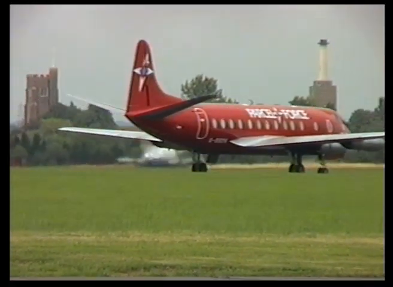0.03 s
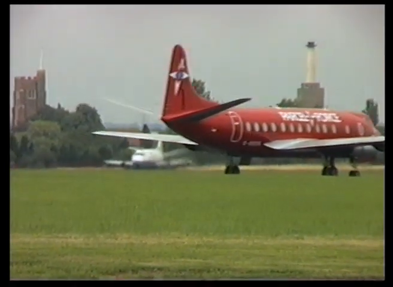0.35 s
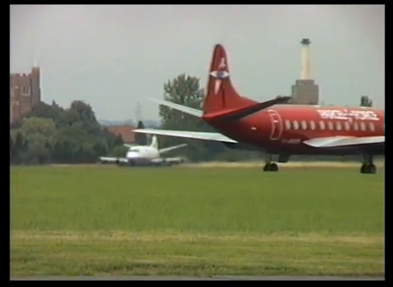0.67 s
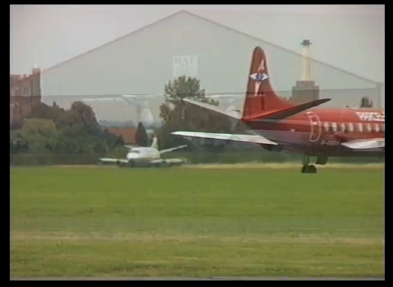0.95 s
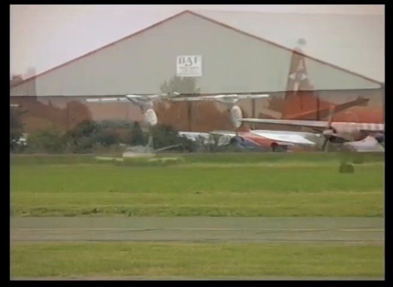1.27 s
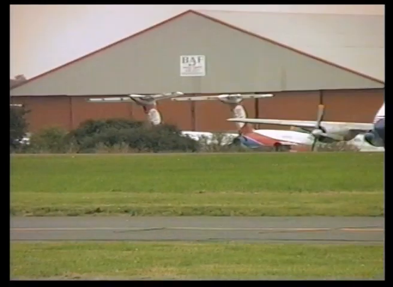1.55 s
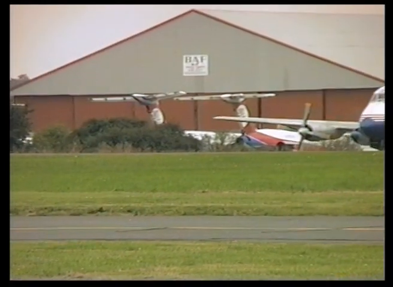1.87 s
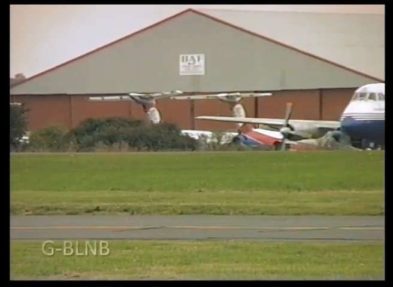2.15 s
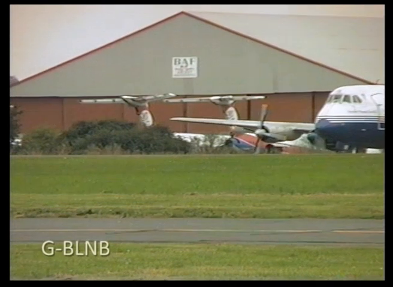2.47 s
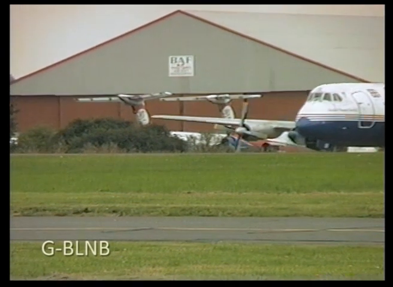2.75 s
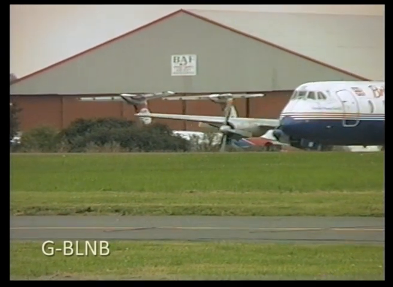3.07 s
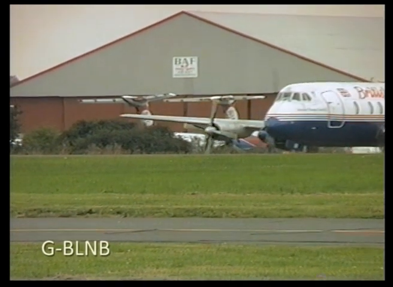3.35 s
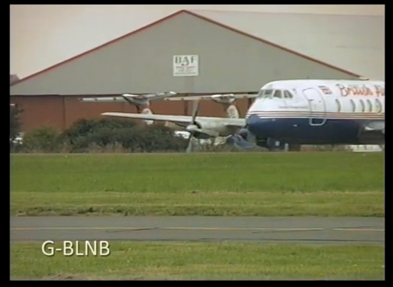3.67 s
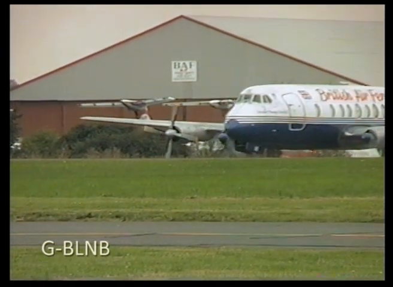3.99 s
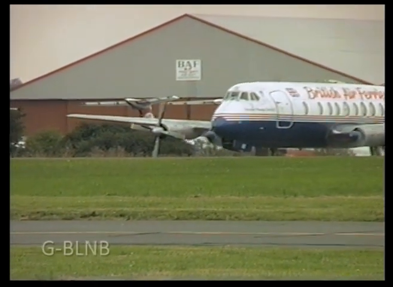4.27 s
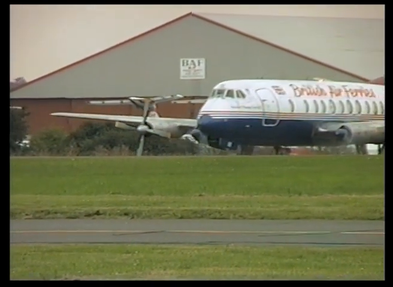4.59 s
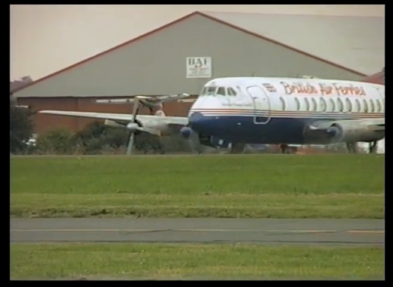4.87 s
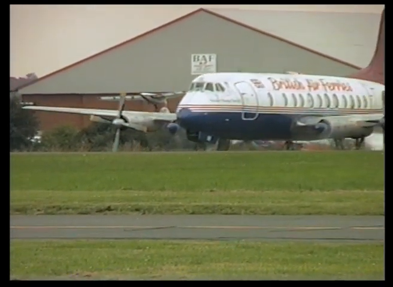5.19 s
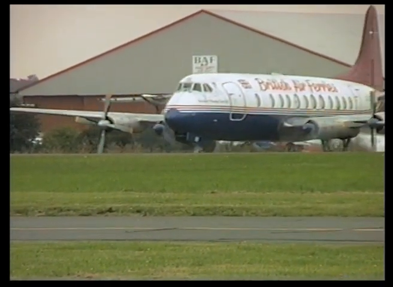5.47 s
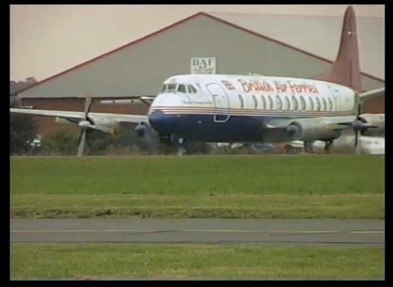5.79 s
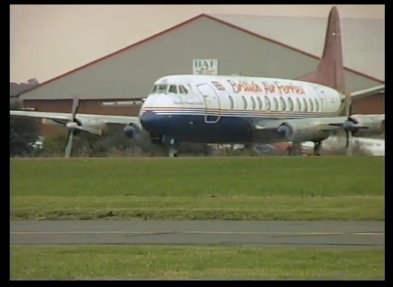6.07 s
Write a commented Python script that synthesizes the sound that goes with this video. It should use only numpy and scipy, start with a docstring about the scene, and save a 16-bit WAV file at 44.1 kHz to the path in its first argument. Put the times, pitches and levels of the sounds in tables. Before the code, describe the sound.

A taxiing propeller airliner drones briefly, then a second approaches with a piercing, wavering turbine whine and hiss as it throttles back.

```python
"""Exhaust roar and propeller drone, heard from behind a four-engined turboprop airliner taxiing away over a
grass airfield. The sound then cross-fades to a second one that comes nose first toward the microphone and
throttles back: its intakes rush, and its compressor whines sink in pitch and beat against each other, chopped
by the propeller blades. The loud whine slightly overloads the microphone's amplifier."""
import sys
import numpy as np
from scipy import signal
from scipy.fft import rfft, irfft, next_fast_len
from scipy.io import wavfile
from scipy.ndimage import map_coordinates

SR = 44100
rng = np.random.default_rng(int(sys.argv[2]) if len(sys.argv) > 2 else 0)


def generate_wav(sig):
    """Save sig (samples, or channels by samples) to the path in sys.argv[1] as 16-bit PCM at SR."""
    pcm = np.round(np.clip(np.atleast_2d(sig).T, -1, 1) * 32767).astype(np.int16)
    wavfile.write(sys.argv[1], SR, pcm)


N = 275184
SECONDS = np.arange(N) / SR
WHINE_PER_BLADE, WHINE_PER_GEAR = 53, 12.23   # whine cycles per propeller blade pass, per shaft turn


def from_db(db):
    """Decibels to gain."""
    return 10 ** (np.asarray(db) / 20)


def rms_one(x):
    """Scale to rms 1."""
    return x / np.sqrt(np.mean(x ** 2) + 1e-20)


def in_time(rows):
    """Each column of a curve table at every sample."""
    times, *columns = np.transpose(rows)
    return [np.interp(SECONDS, times, column) for column in columns]


def drift(rate):
    """Slow random wandering with spread 1, mostly below `rate` Hz."""
    pole = np.exp(-80 * np.pi * rate / SR)
    noise = rng.standard_normal(N // 40 + 2002)
    slow = signal.lfilter([1], [1, -2 * pole, pole * pole], noise)[2000:]
    return np.interp(np.arange(N) / 40, np.arange(len(slow)), rms_one(slow))


def turbulence(spectrum, low_hz, high_hz):
    """The part of a noise spectrum between two soft edges; rms 1."""
    size = next_fast_len(N)
    hz = np.maximum(np.arange(size // 2 + 1) * SR / size, 1)
    points_hz, points_db = np.transpose(spectrum)
    gain = from_db(np.interp(np.log(hz), np.log(points_hz), points_db))
    gain /= np.sqrt((1 + (low_hz / hz) ** 10) * (1 + (hz / high_hz) ** 10))
    return rms_one(irfft(rfft(rng.standard_normal(size)) * gain, size)[:N])


def phase_of(hz):
    """Running phase of a moving frequency."""
    return 2 * np.pi * np.cumsum(hz * np.ones(N)) / SR + rng.uniform(0, 2 * np.pi)


def tone(phase, scatter, rate):
    """A sine of rms about 1; gusty air scatters part of it into a narrow band of noise."""
    wave = (1 + scatter * drift(rate)) * np.sin(phase) + scatter * drift(rate) * np.cos(phase)
    return wave * np.sqrt(2 / (1 + 2 * scatter ** 2))


def harmonic(phase, k, scatter, rate):
    """The k-th multiple of a tone, starting at a random phase."""
    return tone(round(k) * phase + rng.uniform(0, 2 * np.pi), scatter, rate)


# Each row: peak time in seconds, level in dB, rough pitch in Hz, half-width in seconds.
BUFFETS = [(0.742, -23, 140, 0.012), (1.372, -23, 337, 0.048), (1.683, -38, 200, 0.024),
           (4.21, -30.5, 448, 0.0073), (4.369, -38, 370, 0.006), (4.63, -42, 330, .006)]

def buffets():
    """Soft knocks and buffets of air at the microphone: short swells of low noise."""
    out = np.zeros(N)
    for peak_s, db, hz, width_s in BUFFETS:
        band = signal.butter(2, [hz * 0.7, hz * 1.63], "band", fs=SR, output="sos")
        body = rms_one(signal.sosfilt(band, rng.standard_normal(N)))
        swell = np.exp(-.5 * ((SECONDS - peak_s) / width_s) ** 2)
        out += from_db(db) * swell * body
    return out


# Each row: frequency in Hz, relative noise density in dB.
EXHAUST_SPECTRUM = [(25, -28), (60, -12), (130, -2), (350, -8), (650, -1.5), (1050, -9), (1600, -9),
                    (2150, -11), (2420, -6.5), (2750, -16.5), (3080, -8), (3600, -19.5), (7000, -28),
                    (14000, -37.5)]

def exhaust(turn_s, rise_db_per_s=4):
    """Exhaust roar from behind; the rumble grows as the exhausts turn toward the microphone."""
    rumble_db = -30.5 + rise_db_per_s * np.minimum(SECONDS, turn_s)
    rumble = from_db(rumble_db) * turbulence(EXHAUST_SPECTRUM, 15, 385)
    roar = from_db(-23.2) * turbulence(EXHAUST_SPECTRUM, 350, 16000)
    return rumble + roar


# Each row: time in seconds, relative levels of the drone and of the whines in dB.
DEPARTING_LEVELS = [(0, -33, -34.5), (.25, -28, -44), (.5, -43, -34), (.75, -36, -39), (.92, -24, -36),
                    (1.2, -26, -39.5), (1.45, -32, -46)]
# Each row: multiple of the blade rate, relative level in dB.
DRONE_HARMONICS = [(1, -17), (2, -2), (3, -11), (4, -16.5), (6, -26)]
# Each row: one engine's whine in Hz, relative level in dB.
IDLE_WHINES = [(2344, 2), (2388, -8), (2437, 5), (2479, 3)]

def departing(blade_hz=93.9, fade_start_s=1.314, fade_db_per_s=44.5):
    """Tail to the microphone: exhaust, propeller drone and four weak whines die away together."""
    roar = exhaust(turn_s=fade_start_s)
    drone_db, whine_db = in_time(DEPARTING_LEVELS)
    blade = phase_of(blade_hz + .3 * drift(3))
    drone = sum(from_db(db) * harmonic(blade, k, scatter=0.21, rate=11) for k, db in DRONE_HARMONICS)
    whines = sum(from_db(db) * tone(phase_of(hz + 3 * drift(3)), scatter=0.63, rate=16)
                 for hz, db in IDLE_WHINES)
    fade = from_db(-fade_db_per_s * np.maximum(SECONDS - fade_start_s, 0))
    return fade * (roar + from_db(drone_db) * drone + from_db(whine_db) * whines)


# Each row: time in seconds, relative level in dB.
GEAR_LEVEL = [(1.8, -63), (2.4, -43), (3.3, -43), (4.4, -36), (6.24, -37)]
# Each row: multiple of the shaft rate, relative level in dB.
GEAR_HARMONICS = [(1, -22), (2, -5.5), (4, -1.5), (6, 4), (7, 5.5), (8, 3.5)]

def gearbox(whine_hz):
    """Harmonics of a gear shaft that slows with the oncoming engine."""
    shaft = phase_of(whine_hz / WHINE_PER_GEAR)
    level_db, = in_time(GEAR_LEVEL)
    tones = sum(from_db(db) * harmonic(shaft, k, scatter=0.093 * k, rate=9.7)
                for k, db in GEAR_HARMONICS)
    return from_db(level_db) * tones


# Each row: time in seconds, level in dB.
BUZZ_LEVEL = [(1.3, -40), (2.2, -37), (3.2, -44), (5.5, -75), (5.8, -37.5), (6.24, -33.5)]
# Each row: multiple of the blade rate, relative level in dB.
BUZZ_SPECTRUM = [(2, -25), (3, -11.5), (5, -12), (7, -5), (8, -5), (11, -1.5), (13, 1), (16, 1.5)]

def propellers(whine_hz, top_harmonic=16):
    """From in front, blades chop the air into a ragged buzz, geared to the compressor."""
    blade = phase_of(whine_hz / WHINE_PER_BLADE)
    level_db, = in_time(BUZZ_LEVEL)
    comb = 0
    for k in range(2, top_harmonic + 1):
        gain = from_db(np.interp(k, *np.transpose(BUZZ_SPECTRUM)))
        comb += gain * harmonic(blade, k, scatter=0.11 * k, rate=22)
    return from_db(level_db) * rms_one(comb)


# Each row: time in seconds, relative level in dB.
RUSH_LEVEL = [(1.15, -23.5), (1.5, -20), (2.26, -21.5), (2.67, -19), (2.88, -19.5), (4.64, -18.5),
              (4.79, -20), (5.27, -19.5), (6.2, -21)]
HISS_LEVEL = [(2.35, -25), (2.8, -30), (3.35, -24), (4.0, -29), (4.5, -25), (5.1, -23.5), (6.24, -28)]
BEAMED_LEVEL = [(2.0, -42), (2.7, -37), (3.05, -33), (3.5, -26.5), (4.2, -28), (4.6, -30.5), (5.85, -33.5),
                (6.1, -49)]
# Each row: frequency in Hz, relative noise density in dB.
RUSH_SPECTRUM = [(30, -25.5), (150, -22), (380, -28), (700, -19.5), (1000, -9), (1200, -3.5), (1500, 2),
                 (1900, -1.5), (2300, 1), (2550, -4), (2900, -10), (3500, -9)]
IDLE_HISS_SPECTRUM = [(2800, -14), (3100, 1), (3350, 3.5), (3700, -1.5), (4200, -6.5), (4800, -18),
                      (5500, -31.5), (7000, -35)]
BEAMED_SPECTRUM = [(3900, -6.5), (4400, 2.5), (4850, 0), (5400, -12.5), (6000, -12), (6800, -22),
                   (8000, -36), (10500, -39), (14000, -35)]

def intakes(whine_hz, idle_hz=3140):
    """Air rushes into the intakes, the compressors hiss, and a brighter hiss is beamed forward."""
    rush_db, = in_time(RUSH_LEVEL)
    rush = from_db(rush_db + 1.09 + 0.22 * drift(15)) * turbulence(RUSH_SPECTRUM, 15, 3880)
    # the hiss sinks in colour with the compressors' speed
    hiss_db, = in_time(HISS_LEVEL)
    speed = whine_hz / idle_hz
    idle_hiss = turbulence(IDLE_HISS_SPECTRUM, 2600, 8300)
    hiss = map_coordinates(idle_hiss, [np.cumsum(speed)], order=3, mode="wrap")
    hiss *= from_db(hiss_db + 0.6 * drift(9)) / speed ** 3.7
    # the beam is strongest when the intakes point at the microphone
    beamed_db, = in_time(BEAMED_LEVEL)
    beamed = from_db(beamed_db - 2.1 + 0.69 * drift(13)) * turbulence(BEAMED_SPECTRUM, 4500, 16000)
    return rush + hiss + beamed


def throttle_back(midpoint_s=2.21, ease_s=.59, drop_hz=675, base_hz=3045, creep_hz_per_s=17.3):
    """Pitch of the near compressor in Hz: an S-curve down to idle, on top of a slow creep upward."""
    power = 1 / (1 + np.exp((SECONDS - midpoint_s) / ease_s))
    return base_hz + creep_hz_per_s * SECONDS + drop_hz * power


# Air flowing through the propellers into the compressors.
# Each row: time in seconds, scatter of the whine, lead of the odd sidebands in radians.
INFLOW = [(1.4, 0.56, 0.89), (2.1, 0.15, 0.84), (5, 0.28, 1.1), (5.6, 0.18, 1.5)]
# These sidebands change as the nose swings round.
# Each row: offset from the whine in blade rates, relative starting level in dB, change in dB a second.
OUTER_SIDEBANDS = [(-2, -13.5, -0.4), (-2, -18, 1), (1, -15, 0.2)]
# Each row: offset from the octave in blade rates (before rounding), relative dB, scatter, flutter in Hz.
OCTAVE_LINES = [(-4.5, -9, .6, 30), (-2.5, -1.5, 0.3, 30), (-1, -5.5, 1, 60)]

def compressor(hz, engine, octave_db, fading_db=3.5):
    """Blade tone of one compressor; the propeller passing its intake chops it into sidebands."""
    level_db, chop_db = in_time(engine)
    inflow_scatter, lead = in_time(INFLOW)
    phase = phase_of(hz + 1.696 * drift(5.1))
    blade = phase / WHINE_PER_BLADE
    centre = 1 / np.sqrt(1 + from_db(chop_db) ** 2)   # shares its power with the line below
    lines = [(0, centre), (-1, centre * from_db(chop_db))]
    lines += [(round(k), from_db(db + db_per_s * SECONDS + fading_db * drift(1.9)))
              for k, db, db_per_s in OUTER_SIDEBANDS]
    # the blades also bend the tone's phase, so odd lines lead the even ones
    whine = sum(gain * tone(phase + k * blade + (k % 2) * lead, inflow_scatter, rate=48)
                for k, gain in lines)
    # eddies swallowed by the intake give the whine a hissy fringe
    whine *= from_db(level_db) * (1 + 0.18 * drift(510))
    octave = sum(from_db(db) * tone(2 * phase + round(k) * blade, scatter, rate)
                 for k, db, scatter, rate in OCTAVE_LINES)
    return whine + from_db(octave_db) * octave


# Each row: time in seconds, relative whine level in dB, first lower sideband against the centre in dB.
NEAR_WHINE = [(1.0, -24, 3), (1.4, -19.5, -1.5), (1.95, -17.5, -6), (2.35, -17.5, 13), (2.68, -27.5, -13),
              (2.87, -22, -13), (3.2, -21, -14), (3.7, -27.5, -7), (4.1, -26.5, -5), (4.5, -24.5, 13),
              (4.9, -23, -3), (5.45, -19.5, 2), (5.852, -20, 7), (6.24, -17.5, -15)]
FAR_WHINE = [(1.2, -33, -9), (1.6, -27, -3), (1.9, -24, -3), (2.25, -24, 7), (2.6, -33, 14),
             (2.88, -19.5, 7), (3.1, -26, 5), (3.32, -22, -10), (3.9, -28, -4), (4.5, -36, -10),
             (4.82, -19, -14), (5.1, -19.5, -2), (5.35, -37, -5)]
# The far engine slows a little later. Each row: time in seconds, pitch above the near one in Hz.
FAR_PITCH_OFFSET = [(1.5, 20), (2.2, 63), (2.6, 71), (2.93, 93), (3.9, 21), (4.8, 28), (5.4, 10)]
# The intakes beam the whines' octave forward. Each row: time in seconds, relative level in dB.
OCTAVE_LEVEL = [(1.5, -53), (1.8, -40.5), (2.1, -49), (3, -51), (3.75, -33), (4.35, -31.5), (4.6, -41.5),
                (4.9, -28.5), (5.8, -34.5), (6.1, -41)]

def oncoming(fade_start_s=0.81, fade_s=0.41):
    """Nose to the microphone: a near and a far whine fade in over gears, propellers and intakes."""
    near_hz = throttle_back()
    offset_hz, = in_time(FAR_PITCH_OFFSET)
    octave_db, = in_time(OCTAVE_LEVEL)
    near = from_db(0.5) * compressor(near_hz, NEAR_WHINE, octave_db - 5.5)
    far = from_db(-2.1) * compressor(near_hz + offset_hz, FAR_WHINE, octave_db - 6)
    fade = np.clip((SECONDS - fade_start_s) / fade_s, 0, 1)
    return fade * (near + far + gearbox(near_hz) + propellers(near_hz) + intakes(near_hz))


def scene():
    """The departing airliner, then the oncoming one, the sound cross-fading from one to the other."""
    return (departing() + oncoming() + buffets())[None]


def record(dry):
    """Overload rounds the peaks, so the treble rasps with each beat of the whine."""
    ceiling, line_scan_hz, cutoff_hz = 0.73, 15625, 15750
    rounded = ceiling * np.tanh(dry / ceiling)
    dulled = signal.sosfilt(signal.butter(4, 11800, fs=SR, output="sos"), rounded)
    # the camera adds its line whistle and a faint hiss
    whistle = from_db(-77) * np.sin(phase_of(line_scan_hz))
    hiss = from_db(-62.5) * rng.standard_normal(N)
    steep_lowpass = signal.ellip(12, .1, 90, cutoff_hz, fs=SR, output="sos")
    return signal.sosfilt(steep_lowpass, dulled + whistle + hiss)


dry = scene()
out = record(dry)
generate_wav(out)
```